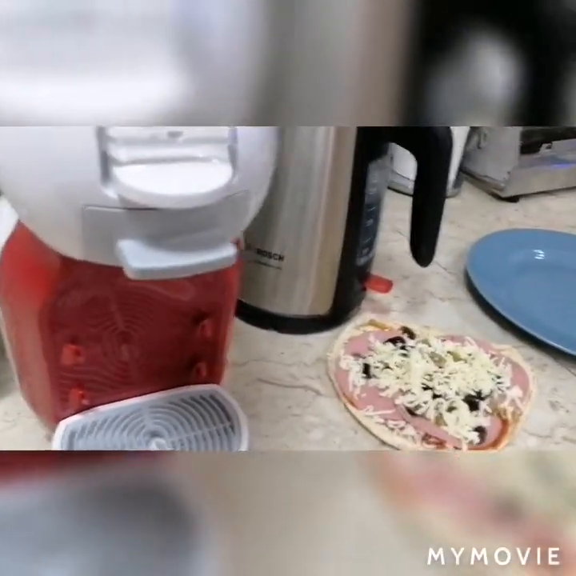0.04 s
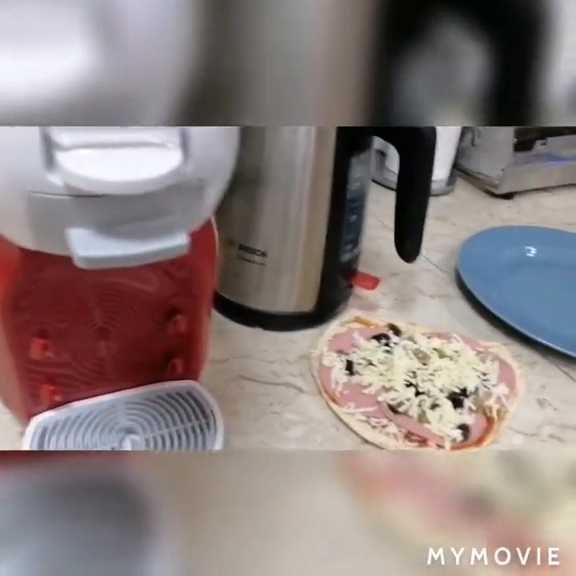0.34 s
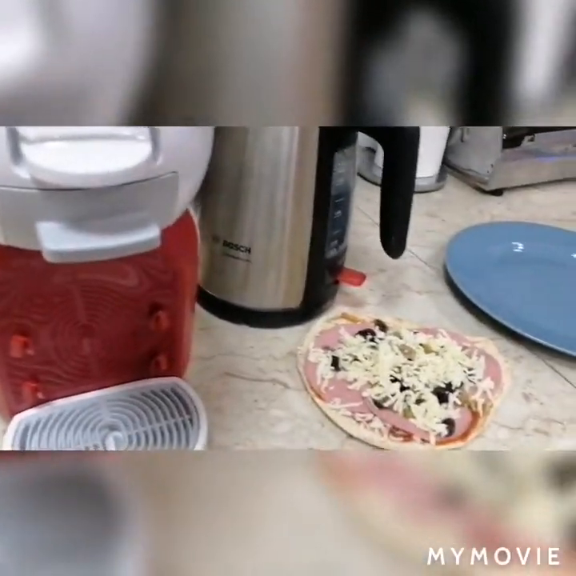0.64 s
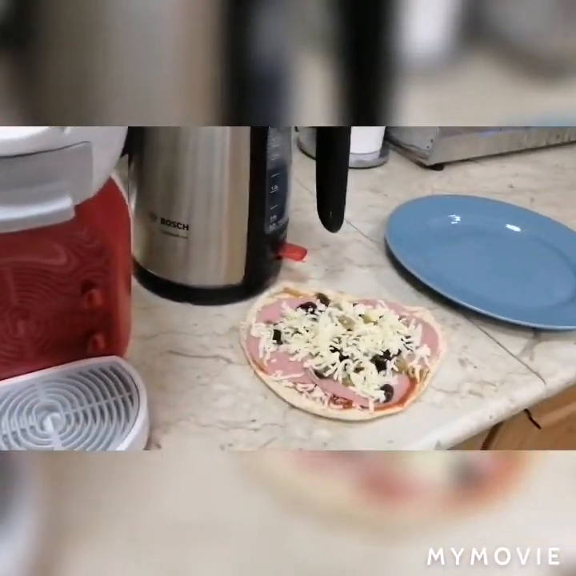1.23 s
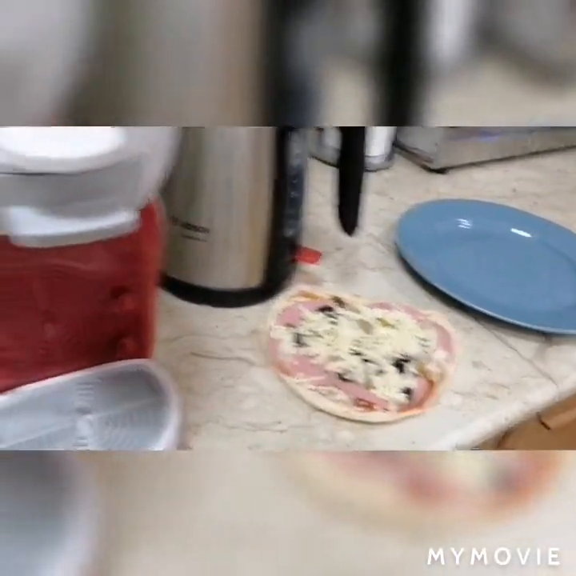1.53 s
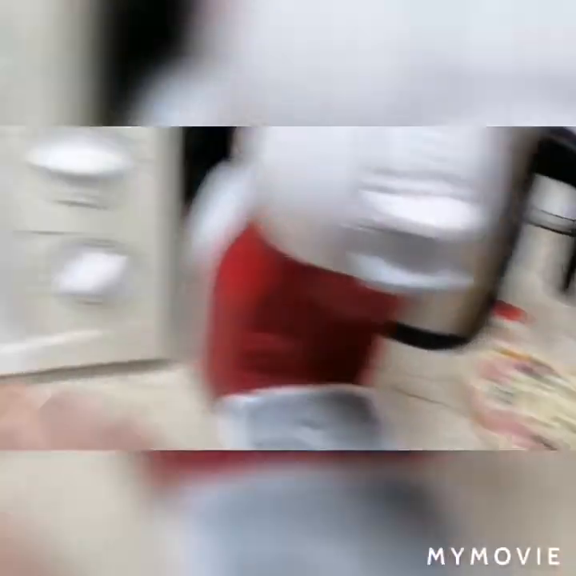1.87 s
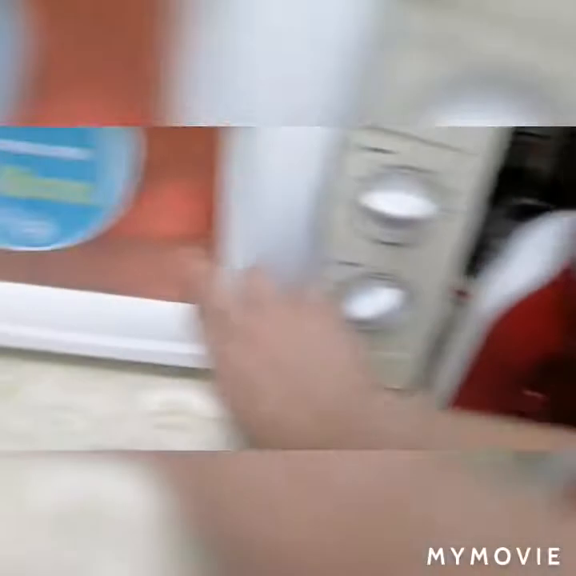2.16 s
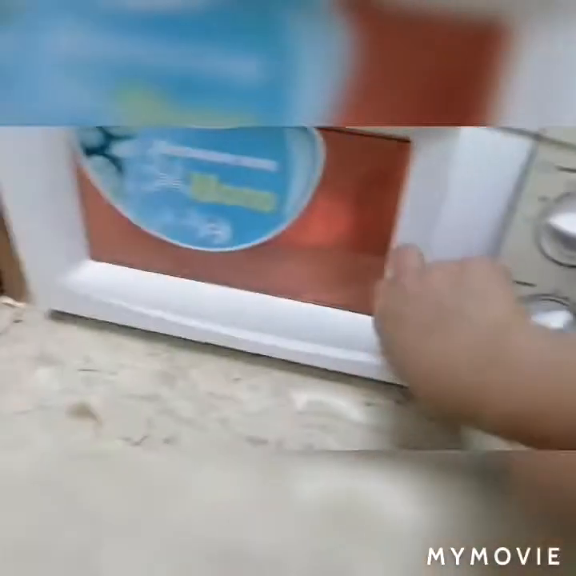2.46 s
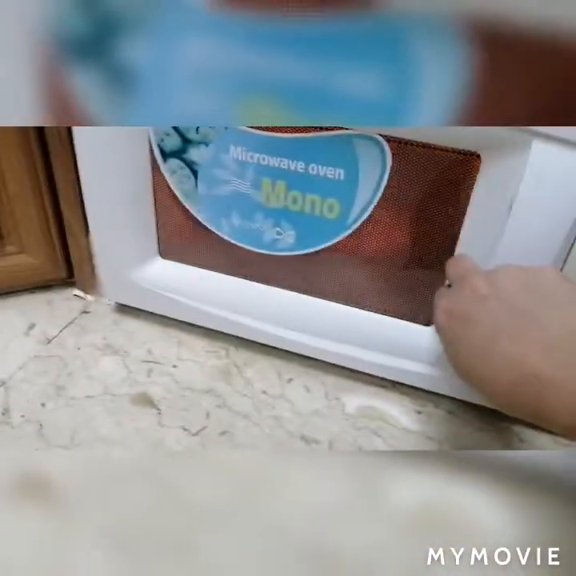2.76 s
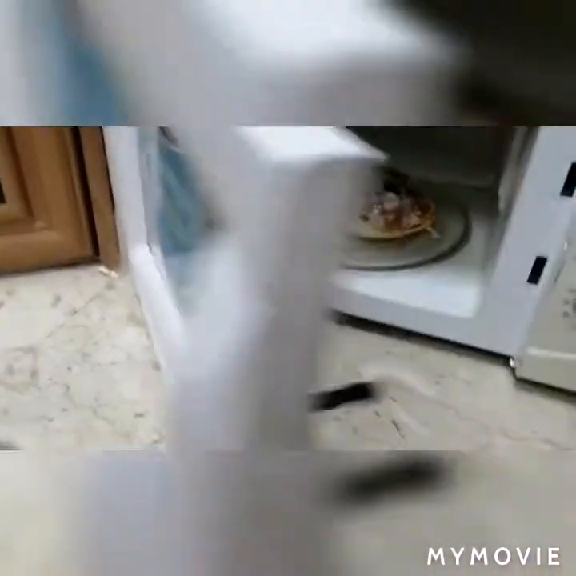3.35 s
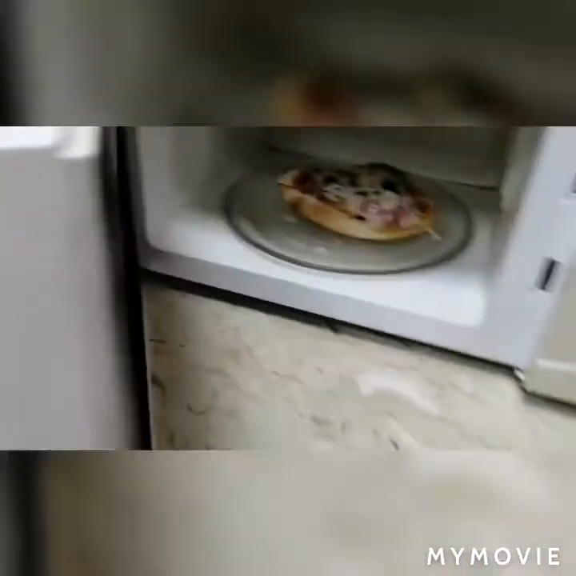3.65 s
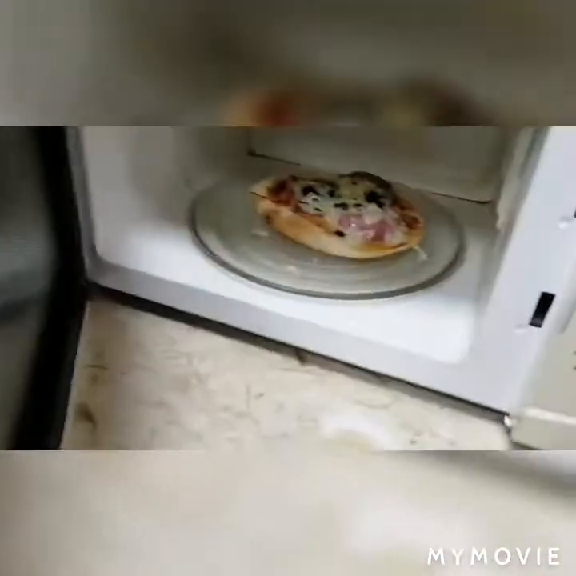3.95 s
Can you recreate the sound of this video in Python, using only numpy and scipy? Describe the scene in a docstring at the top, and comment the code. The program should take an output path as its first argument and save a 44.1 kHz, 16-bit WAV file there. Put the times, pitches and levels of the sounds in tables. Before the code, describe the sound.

A microwave oven hums and buzzes, then stops as its door clunks open.

```python
"""Opening a running microwave oven

A microwave oven runs on a kitchen counter: its transformer hums, its sheet-metal case buzzes and its
fan blows. The listener moves round to the door and pulls it: the safety switch clicks, the hum dies,
the latch hooks snap free and the door rings and thumps. A faint hiss and the drone of another
appliance, perhaps a fridge, remain."""
import sys
import numpy as np
from scipy import signal
from scipy.fft import rfft, irfft
from scipy.io import wavfile
from scipy.ndimage import uniform_filter1d, map_coordinates

SR = 44100
rng = np.random.default_rng(int(sys.argv[2]) if len(sys.argv) > 2 else 0)


def file_out(sig):
    """Save sig as 16-bit WAV at sys.argv[1]."""
    # one column per channel
    cols = np.atleast_2d(sig).T
    # limit, then scale
    lim = np.clip(cols, -1, 1)
    pcm = np.round(lim * 32767).astype(np.int16)
    wavfile.write(sys.argv[1], SR, pcm)


N = 176400
T = np.arange(N) / SR
STEPS = np.arange(401) / 100  # a coarse clock for slow changes, one step every 10 ms
HUM_HZ, POWER_OFF_S, TOP_HZ = 100.07, 2.91, 15750

# The listener leaves the oven's side, nears its corner, goes on, reaches the door: t/s
WALK_TIMES = [1.65, 1.88, 2.05, 2.5]
# Transformer hum, one row each for 1 to 5 times its pitch: level/dB at the side, corner, door
HUM_LEVELS = [(-32, -33, -32), (-34, -30.5, -30.5), (-40.5, -42, -41.5), (-54, -59, -64),
              (-49.5, -75.5, -55.5)]
# Rough strength of the case's buzzing overtones: f/Hz, level/dB at the side, corner, door
BUZZ_SPECTRUM = [(700, -67.5, -70, -63), (1070, -71, -66, -71), (1880, -70, -78, -74),
                 (2750, -73, -66, -77), (3200, -66.5, -64, -61.5), (4200, -70, -67.5, -71),
                 (5700, -77.5, -75, -75), (6570, -79.5, -81.5, -85), (6720, -64.5, -62, -65),
                 (7300, -70.5, -73, -81), (8250, -64.5, -66, -65), (8520, -70.5, -68, -67),
                 (9920, -71.5, -75.5, -80), (11000, -85, -91, -91), (12300, -83, -89, -90),
                 (13100, -91, -96, -91)]
# Overtones where the panels resonate: multiple of the hum pitch, level/dB at the side, corner, door
PANEL_RESONANCES = [(6, -61.5, -66, -55.5), (8, -62, -55.5, -53), (14, -63, -62, -63),
                    (15, -64, -64.5, -57.5), (17, -84, -70, -61), (18, -90, -59, -59.5),
                    (20, -61.5, -64, -65), (25, -56.5, -61, -65.5), (27, -56, -56.5, -59.5),
                    (28, -63.5, -53, -62), (29, -64, -65, -58.5), (30, -70, -59, -93), (32, -68, -64, -56),
                    (33, -60, -60, -57), (39, -68, -59, -61.5), (46, -67.5, -61, -64.5),
                    (60, -64, -64, -75), (71.4, -62, -55.5, -56), (82.5, -54, -57, -57)]
# Boost or cut of the whole buzz, which swells in passing the corner: t/s, level/dB
BUZZ_CURVE = [(0, .5), (1.7, -.5), (1.9, 1.5), (2.1, -0.5), (2.3, 1.5), (2.9, -2)]
# Further boost or cut of the buzz's treble: t/s, level/dB
TREBLE_CURVE = [(0, -0.5), (.5, -0.5), (1.4, 1), (2.2, 0), (2.55, -0.5), (2.72, -3), (2.88, -16)]
# Air from the fan: f/Hz, level/dB per Hz
FAN_SPECTRUM = [(25, -107), (55, -69.5), (80, -85), (130, -72), (220, -76), (300, -75), (450, -82),
                (650, -88.5), (1000, -95.5), (1700, -91.5), (2800, -89.5), (4100, -100), (5500, -101),
                (7000, -96), (8300, -95), (11000, -112), (15000, -118)]
# Extra air heard near the door vents: f/Hz, level/dB per Hz
VENT_SPECTRUM = [(100, -86), (300, -87), (550, -79.5), (850, -76), (1200, -78.5), (1700, -92),
                 (3300, -83.5), (4200, -93), (7000, -83), (12000, -115)]
# How far that vent air is turned down: t/s, level/dB
VENT_CURVE = [(0, -9), (1.5, -29), (2.1, -14), (2.5, -2), (2.7, -7), (2.9, -9.5), (3.2, -15.5), (4, -29)]
# Steady noise of the kitchen: f/Hz, level/dB per Hz
ROOM_SPECTRUM = [(20, -92), (55, -77.5), (80, -80), (130, -73), (220, -77.5), (330, -79), (500, -87.5),
                 (850, -91.5), (1200, -93), (2000, -98.5), (3100, -99), (4000, -109), (6000, -112),
                 (15000, -118)]
# Faint high hiss: f/Hz, level/dB per Hz
HISS_SPECTRUM = [(3000, -125), (4300, -108), (5400, -97.5), (6100, -98.5), (7000, -89), (7700, -97),
                 (8400, -90.5), (9500, -97.5), (11000, -104), (13700, -108), (14900, -103), (15800, -110)]
# Boost or cut of that hiss: t/s, level/dB
HISS_CURVE = [(0, -5), (2.5, -1.5), (2.75, -15), (3.3, -5), (3.6, 0.5), (4, 0)]
# Tones of the other appliance: f/Hz, level/dB
DRONE_TONES = [(134.6, -61), (199.6, -48), (400, -65), (662, -65), (799, -67.5), (861.3, -61), (926, -72),
               (1125, -70.5), (1459, -74.5)]
# Hits in the switch and latch: t/s, metal snap level/dB, plastic knock level/dB, fade time/s
LATCH_HITS = [(2.8945, -31, -50, 0.021), (2.9112, -30.5, -57, 0.06), (2.916, -34.5, -54, 0.061),
              (2.9982, -38, -35, 0.029), (3.0014, -42, -31.5, 0.046), (3.0125, -30, -44, 0.06),
              (3.0232, -27.5, -32, 0.054), (3.0273, -31, -31, 0.067), (3.041, -34.5, -34, 0.093)]
# Tone colour of the bright metal snap: f/Hz, relative level/dB
SNAP_SPECTRUM = [(1000, -10), (3200, -17), (4300, -21), (5250, 1), (6000, -4.5), (6950, 3.5), (7700, -4),
                 (8500, 0.5), (9400, -8.5), (11000, -16), (14000, -21), (15300, -24)]
# Tone colour of the dull plastic knock: f/Hz, relative level/dB
KNOCK_SPECTRUM = [(60, 5), (200, 3), (350, 2), (500, 0.5), (800, 0.5), (1200, 1.5), (1550, -7),
                  (1900, -2.5), (2400, -5), (3100, -3), (4000, -14), (6000, -18), (12000, -35)]
# Ringing tones of the door frame and latch spring: f/Hz, level/dB relative to the hit, fade time/s
DOOR_TONES = [(810, -20, 0.31), (1438, -27, .5), (1860, -21, 0.24), (2859, -31, .33), (3165, -26, 0.66),
              (5210, -23, 0.47), (6400, -36, 0.23), (6917, -21, 0.11), (7110, -32, 0.21), (8800, -19, .22)]
# Low thumps as the door swings free: t/s, f/Hz, level/dB, rise time/s, fade time/s
DOOR_THUMPS = [(3.034, 131, -23, 0.01, 0.22), (3.06, 43.7, -40, 0.048, 0.34)]


def from_db(db):
    """Turn decibels into a gain to multiply by."""
    return 10 ** (np.asarray(db) / 20)


def db_at(spectrum, hz):
    """Read the level at any pitch from a table of f/Hz, level/dB."""
    f, db = np.transpose(spectrum)
    return np.interp(np.log(hz + 1e-3), np.log(f), db)


def gain_along(curve, t=T):
    """Gain that follows a table of t/s, level/dB."""
    return from_db(np.interp(t, *np.transpose(curve)))


def along_walk(levels, t=T):
    """Blend the levels at three places as the listener moves."""
    place = np.interp(t, WALK_TIMES, [0.15, 0.69, 0.88, 2])  # 0 is the side, 1 the corner, 2 the door
    return sum(np.maximum(1 - abs(place - k), 0) * db for k, db in enumerate(levels))


def drift(rate_hz, shape):
    """Smooth random values of typical size 1, one row every 10 ms."""
    memory = np.exp(-2 * np.pi * rate_hz / 100)
    white = rng.standard_normal((shape[0] + 200,) + shape[1:])
    slow = signal.lfilter([1], [1, -2 * memory, memory ** 2], white, axis=0)[200:]  # skip the run-up
    return slow / slow.std()


def waver(rate_hz):
    """A random drift with a value for every sample."""
    return np.interp(T, STEPS, drift(rate_hz, STEPS.shape))


def noise(spectrum):
    """Noise shaped by a table of f/Hz, level/dB per Hz."""
    hz = np.arange(N // 2 + 1) * SR / N
    white = rfft(rng.standard_normal(N))
    return irfft(white * from_db(db_at(spectrum, hz)), N) * np.sqrt(SR / 2)


def fade(start_s, fade_s):
    """Full gain until the start, then a fall of 60 dB in each fade time."""
    return np.exp(-np.log(1000) * np.maximum(T - start_s, 0) / fade_s)


def transformer_hum(waver_db=0.85, stop_s=0.09):
    """The transformer core flexes at twice the mains rate and stops soon after the power goes off."""
    hum = 0
    for multiple, levels in enumerate(HUM_LEVELS, 1):
        gain = from_db(along_walk(levels) + waver_db * waver(2))
        hum += gain * np.cos(2 * np.pi * multiple * HUM_HZ * T)
    switch_off = np.clip(1 - (T - POWER_OFF_S) / stop_s, 0, 1) ** 1.46
    return np.sqrt(2) * hum * switch_off


def buzz_gains(hz, t, scatter_db=2.75, swell_db=1.67):
    """How strong each overtone of the case is over time; the panel resonances get their own levels."""
    db = np.array([db_at(np.array(BUZZ_SPECTRUM)[:, [0, place]], hz) for place in (1, 2, 3)])
    db += scatter_db * rng.standard_normal(db.shape)
    for multiple, *levels in PANEL_RESONANCES:
        db[:, round(multiple)] = levels
    gain = from_db(along_walk(db, t)) * gain_along(BUZZ_CURVE, t)
    gain *= gain_along(TREBLE_CURVE, t) ** np.clip((hz - 2500) / 3000, 0, 1)
    gain[:, :len(HUM_LEVELS) + 1] = 0  # the hum supplies the lowest tones
    # Groups of high overtones swell and fade together.
    swell = uniform_filter1d(drift(3.2, gain.shape), size=12, axis=1)
    return gain * from_db(swell_db * swell / swell.std() * (hz > 6000))


def case_buzz(beat_s=0.212, slide_s=22e-6, wander_depth=0.13, wander_hz=2.8, size=8192):
    """The case rattles once per hum cycle; alternate rattles slide apart and back in a slow beat."""
    t = STEPS[:, None]
    hz = HUM_HZ * np.arange(int(TOP_HZ / HUM_HZ))
    gain = buzz_gains(hz, t)
    slide_angle = 2 * np.pi * hz * slide_s * np.sin(np.pi * (t - 0.15) / beat_s)
    tones = []
    # Sliding moves part of each overtone into a tone halfway to the next one.
    for share in (np.cos(slide_angle), np.sin(slide_angle)):
        wander = wander_depth * (drift(wander_hz, gain.shape) + 1j * drift(wander_hz, gain.shape))
        random_phase = np.exp(2j * np.pi * rng.random(len(hz)))
        tones.append(gain * share * (random_phase + wander))
    # Build the wave of two rattles for every time step, then play through these waves in a loop.
    spectra = np.stack(tones, axis=-1).reshape(len(t), -1)
    waves = irfft(spectra, size, axis=1) * size / np.sqrt(2)
    loop_position = (HUM_HZ / 2 * T % 1) * size
    buzz = map_coordinates(waves, [T / STEPS[1], loop_position], order=1, mode="nearest")
    return buzz * fade(POWER_OFF_S, fade_s=0.094)


def fan(flutter=0.1, blade_hz=181.5, blade_db=-47):
    """Rushing air flutters with the hum and the blades add a tone; both fade once the power is off."""
    air = noise(FAN_SPECTRUM) * (1 + flutter * np.cos(2 * np.pi * HUM_HZ * T))
    blades = np.sqrt(2) * from_db(blade_db) * np.sin(2 * np.pi * blade_hz * T + 0.13 * waver(1.7))
    return (air + blades) * fade(POWER_OFF_S, fade_s=0.95)


def vent_air():
    """Air rushes through the vents, loudest as the listener reaches the door."""
    return noise(VENT_SPECTRUM) * gain_along(VENT_CURVE)


def appliance_drone(waver_db=1.23):
    """Another appliance drones in wavering tones, heard more weakly at the oven's side."""
    drone = 0
    for hz, db in DRONE_TONES:
        gain = from_db(db + waver_db * waver(12))
        drone += gain * np.sin(2 * np.pi * hz * T + 0.27 * waver(4))
    return np.sqrt(2) * drone * from_db(along_walk([-13.5, 0, 0]))


def room_noise():
    """Steady kitchen noise, and a high hiss that dips for a moment."""
    return noise(ROOM_SPECTRUM) + noise(HISS_SPECTRUM) * gain_along(HISS_CURVE)


def burst(spectrum, power):
    """The dense ringing of a struck part: noise that follows the given power over time."""
    ringing = noise(spectrum)
    return ringing / ringing.std() * np.sqrt(power)


def switch_and_latch(echo_fade_s=0.64, echo_rise_s=0.01, snap_echo_db=-18, knock_echo_db=-11):
    """Each hit gives a bright metal snap and a dull plastic knock, which echo in the kitchen."""
    snap_power, knock_power = 0, 0
    for start_s, snap_db, knock_db, fade_s in LATCH_HITS:
        direct = fade(start_s, fade_s) * (T >= start_s)
        echo_rise = 1 - np.exp(-np.maximum(T - start_s, 0) / echo_rise_s)
        echo = echo_rise * fade(start_s, echo_fade_s)
        snap_power += from_db(snap_db) ** 2 * (direct ** 2 + (from_db(snap_echo_db) * echo) ** 2)
        knock_power += from_db(knock_db) ** 2 * (direct ** 2 + (from_db(knock_echo_db) * echo) ** 2)
    return burst(SNAP_SPECTRUM, snap_power) + burst(KNOCK_SPECTRUM, knock_power)


def door_ring(split_hz=4000):
    """The door frame and latch spring ring: knocks start the low tones, snaps the high ones."""
    times, snap_db, knock_db, _ = np.transpose(LATCH_HITS)
    ring = 0
    for hz, db, fade_s in DOOR_TONES:
        hit_db = snap_db if hz > split_hz else knock_db
        kicks = np.zeros(N) + 1e-18
        kicks[(times * SR).astype(int)] = from_db(db + hit_db) * rng.choice([-1, 1], len(times))
        # This filter turns every kick into a fading tone.
        decay = np.exp(-np.log(1000) / (fade_s * SR))
        angle = 2 * np.pi * hz / SR
        ring += signal.lfilter([0, np.sin(angle)], [1, -2 * decay * np.cos(angle), decay ** 2], kicks)
    return ring


def door_thump():
    """The freed door and the oven body swing briefly at a low pitch."""
    thump = 0
    for start_s, hz, db, rise_s, fade_s in DOOR_THUMPS:
        age = T - start_s
        gain = from_db(db) * np.clip(age / rise_s, 0, 1) * fade(start_s + rise_s, fade_s)
        thump += gain * np.sin(2 * np.pi * hz * age)
    return thump


def scene():
    """Add the oven, the kitchen and the door into one channel."""
    oven = transformer_hum() + case_buzz() + fan() + vent_air()
    kitchen = appliance_drone() + room_noise()
    door = switch_and_latch() + door_ring() + door_thump()
    return (oven + kitchen + door)[None]


def record(dry):
    """Cut off the very highest treble steeply."""
    return signal.sosfilt(signal.ellip(12, .1, 80, TOP_HZ, fs=SR, output="sos"), dry)


dry = scene()
out = record(dry)
file_out(out)
```